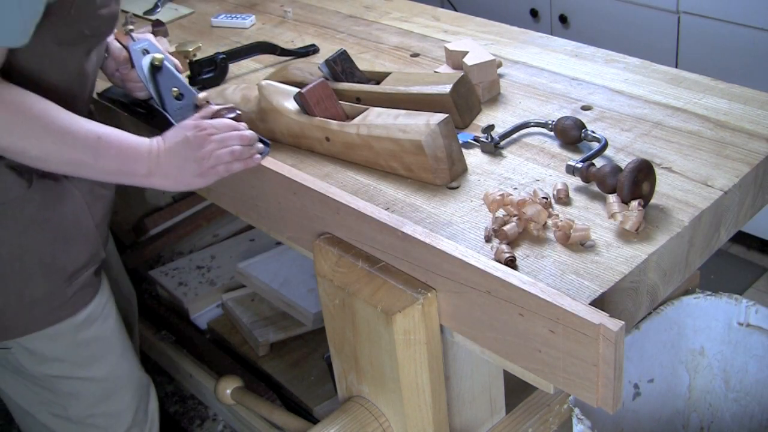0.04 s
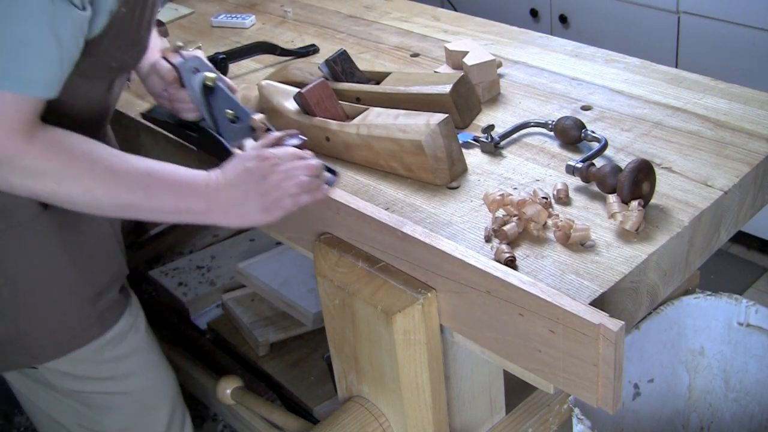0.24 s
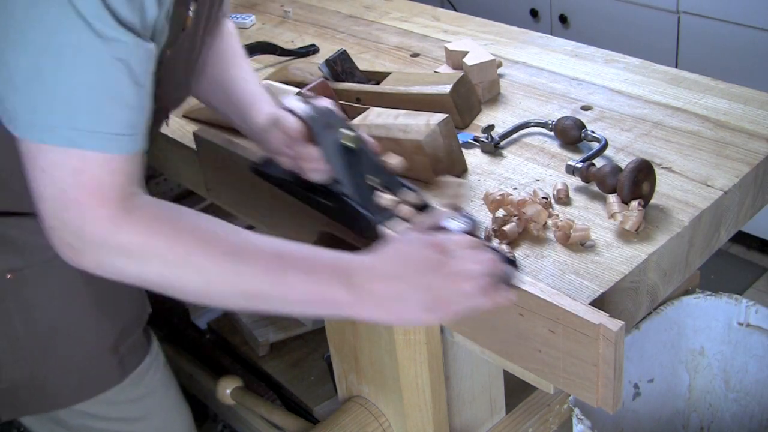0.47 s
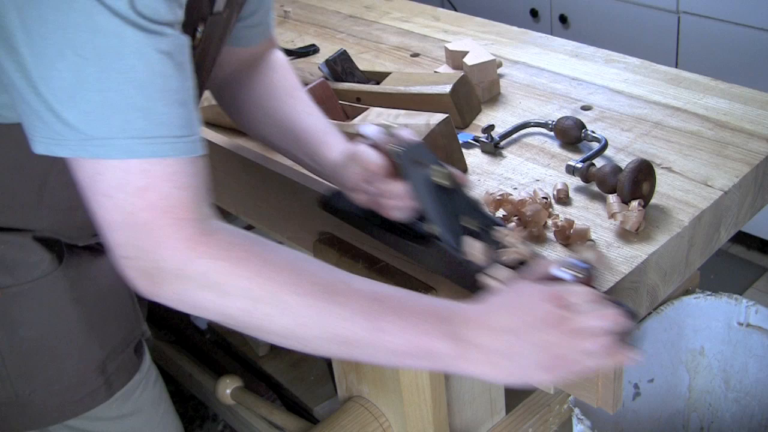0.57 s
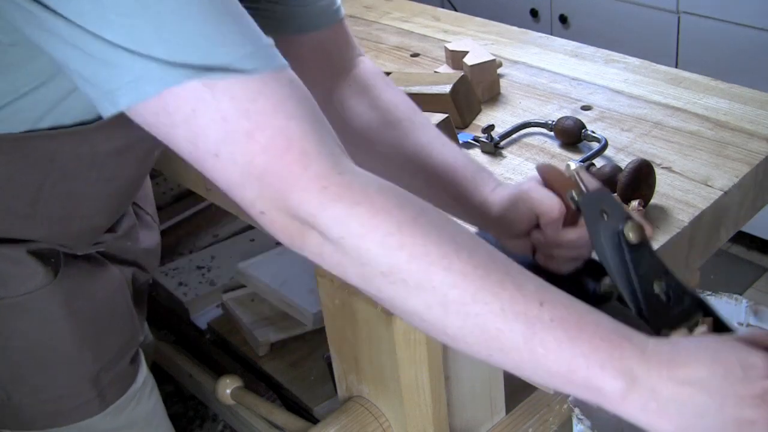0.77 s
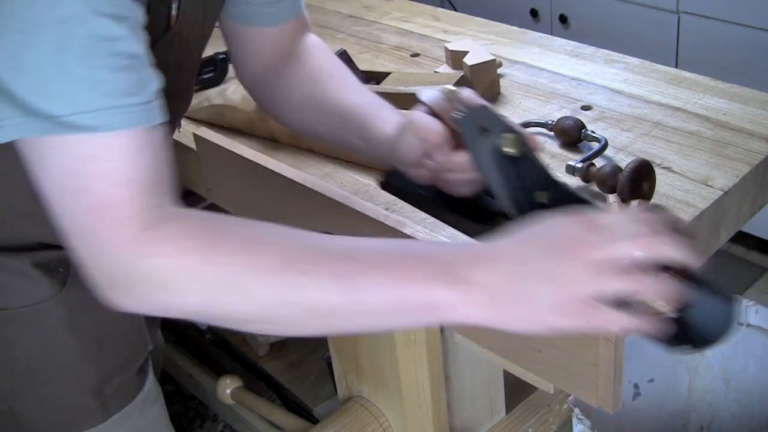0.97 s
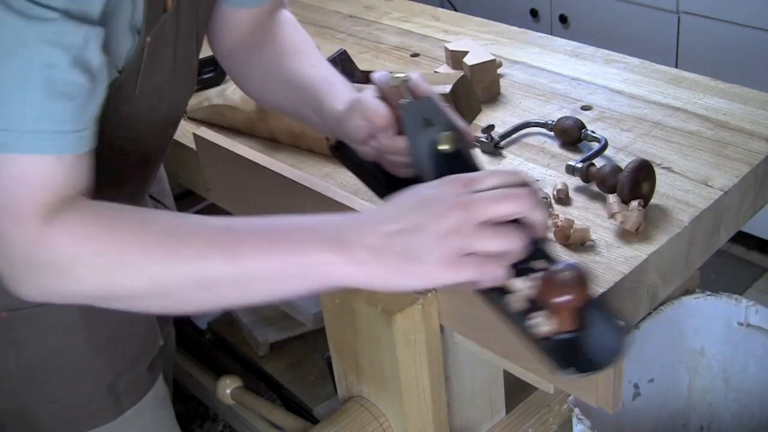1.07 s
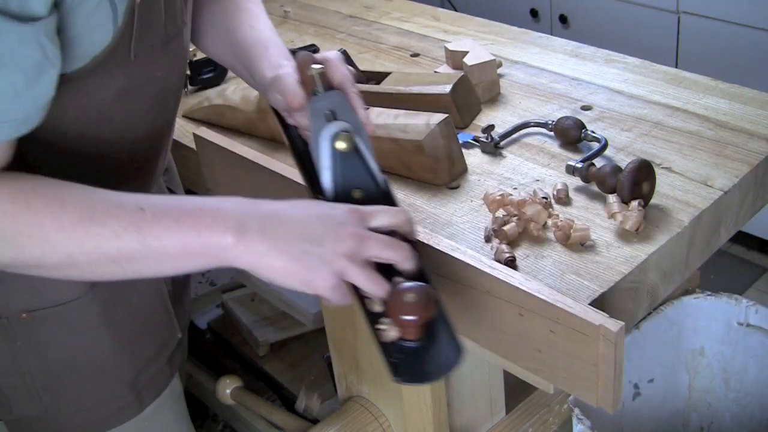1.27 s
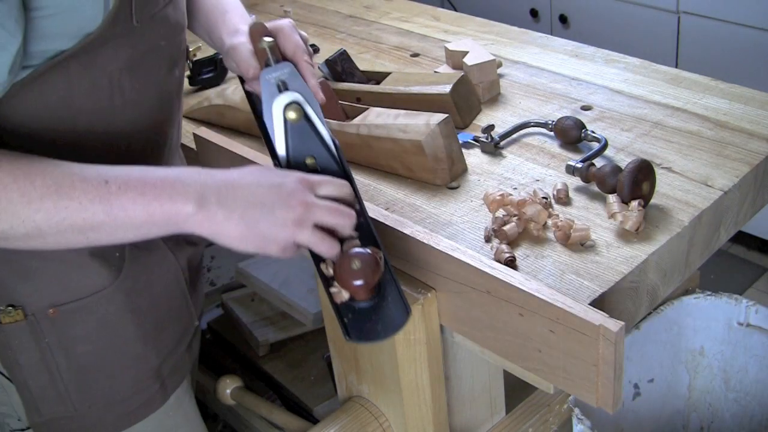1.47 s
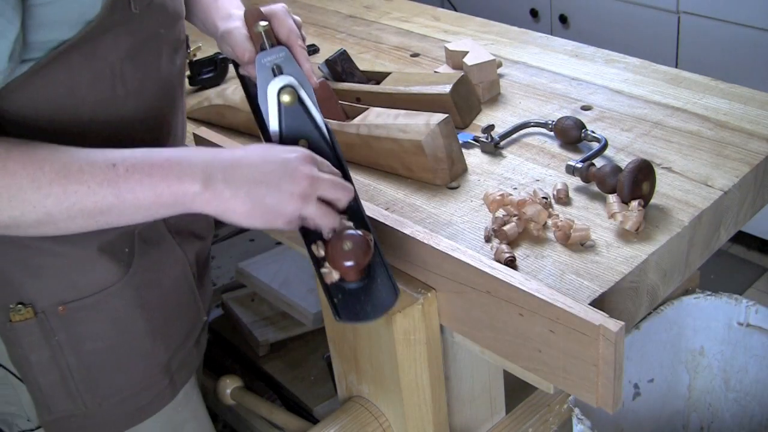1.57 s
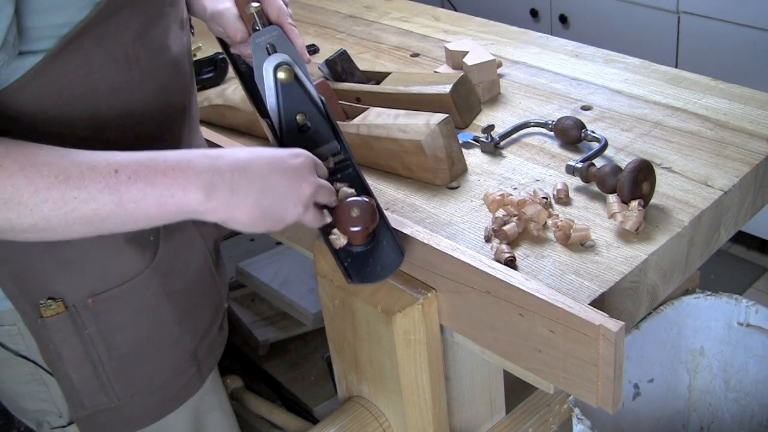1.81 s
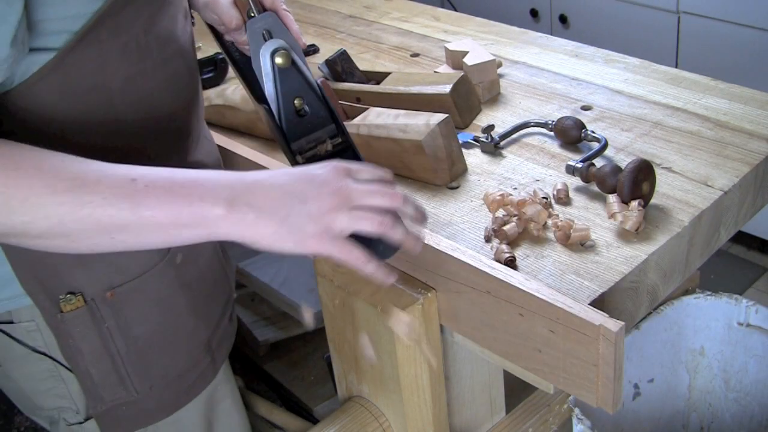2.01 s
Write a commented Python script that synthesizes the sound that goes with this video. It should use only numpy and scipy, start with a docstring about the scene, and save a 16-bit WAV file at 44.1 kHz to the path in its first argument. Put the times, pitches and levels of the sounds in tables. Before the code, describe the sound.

A metal hand plane shaves a board in one long rasping stroke, then bumps and faint rustling

```python
"""In a small workshop, a metal hand plane takes one long stroke along a board edge.
The shaving breaks at a rate that follows the push, heard as a wavering buzz of two sine tones.
Random clicks stand for tearing fibres: they ring board and iron and make the curl hiss; rough bands groan.
Short noise bursts are snaps and ticks; dying sines are dull bumps as the plane lifts, and one later low knock.
Bursts of grains are fingers pulling the rustling shaving out; room echo, rumble and air lie around it."""
import sys
import numpy as np
from scipy import signal
from scipy.io import wavfile

SR = 44100
rng = np.random.default_rng(int(sys.argv[2]) if len(sys.argv) > 2 else 0)


def wav_record(signal):
    """Record a signal, one row per channel, as 16-bit PCM in the file named by sys.argv[1]."""
    frames = np.transpose(np.atleast_2d(signal))
    bounded = np.clip(frames, -1, 1)
    # unit amplitude maps onto the largest positive 16-bit level
    quanta = np.round(bounded * 32767).astype(np.int16)
    wavfile.write(sys.argv[1], SR, quanta)


N = 90404   # length of the scene in samples


def from_db(db):
    """Turn a level in dB into a gain."""
    return 10 ** (np.asarray(db) / 20)


def rms_one(x):
    """Scale a sound to an average strength (rms) of 1."""
    return x / np.sqrt(np.mean(x ** 2) + 1e-20)


def seconds():
    """The time of every sample in seconds."""
    return np.arange(N) / SR


def in_time(rows):
    """Join the rows of a table: one line of straight pieces per column; the first column is the time."""
    times, *columns = np.transpose(rows)
    return [np.interp(seconds(), times, column) for column in columns]


def drift(rate_hz):
    """Random wandering around 0 with rms 1; a higher rate wanders faster."""
    step = 40   # computed only at every 40th sample, then joined by lines
    r = np.exp(-2 * np.pi * rate_hz * step / SR)
    noise = rng.standard_normal(N // step + 2002)
    slow = signal.lfilter([1], [1, -2 * r, r * r], noise)[2000:]   # skip the start-up of the filter
    return np.interp(np.arange(N) / step, np.arange(len(slow)), rms_one(slow))


def band(x, low_hz, high_hz):
    """Keep mainly the sound between two frequencies."""
    edges = [low_hz, min(high_hz, SR * .45)]
    return signal.sosfilt(signal.butter(2, edges, "band", fs=SR, output="sos"), x)


def ring(x, hz, width_hz):
    """One resonance: a click of height 1 rings with height 1, and dies faster if the width is larger."""
    r, w = np.exp(-np.pi * width_hz / SR), 2 * np.pi * hz / SR
    return signal.lfilter([0, np.sin(w)], [1, -2 * r * np.cos(w), r * r], x + 1e-18)


def rings(x, peaks, patchy_db, rate_hz):
    """Several resonances whose strengths shift as the plane travels; rms 1."""
    total = 0
    for hz, width_hz, db in peaks:
        strength = from_db(db + patchy_db * drift(rate_hz))
        # the root makes wide and narrow resonances equally strong
        total = total + strength * np.sqrt(width_hz) * ring(x, hz, width_hz)
    return rms_one(total)


def grains(per_s, spread_db):
    """Random clicks of uneven size, pushing up or down."""
    happens = rng.random(N) < per_s / SR
    size = from_db(spread_db * np.minimum(rng.exponential(1, N), 5))
    return happens * size * rng.choice([-1, 1], N)


def coloured(pair, spectrum, patchy_db, rate_hz):
    """Third-octave bands, each with its own level and flicker, taken in turn from two sounds; rms 1."""
    hz, db = np.transpose(spectrum)
    edges = hz[0] * 2 ** np.arange(0, np.log2(hz[-1] / hz[0]) + 1 / 3, 1 / 3)
    total = 0
    for k, (low, high) in enumerate(zip(edges, edges[1:])):
        band_db = np.interp(np.log(low * high) / 2, np.log(hz), db)
        flicker = from_db(band_db + patchy_db * drift(rate_hz))
        total = total + flicker * band(pair[k % 2], low, high)
    return rms_one(total)


# Tone colour of the shop air. Each row: frequency in Hz, relative strength in dB per Hz.
AIR_COLOUR = [(250, -31), (400, -8.5), (700, -10.5), (2300, -17), (4000, -20.5), (10000, -25), (15500, -32)]
# Loudness of the shop air. Each row: time in seconds, level in dB.
AIR_LEVEL = [(0, -66.5), (1.7, -61), (2.05, -67.5)]


def shop_air():
    """Steady noise of the shop, with bands that flicker a little."""
    noise = rng.standard_normal((2, N))
    return from_db(in_time(AIR_LEVEL)[0]) * coloured(noise, AIR_COLOUR, 1.0, 6.2)


# Bench and body move. Each row: time in seconds, deep level in dB, low level in dB before its wobble.
RUMBLE = [(0.0, -56, -62.5), (0.21, -52, -54), (0.28, -81, -44), (0.5, -47, -59), (0.58, -84, -61),
          (0.69, -48, -69), (0.87, -51.5, -48), (0.93, -36.5, -41.5), (1.04, -50, -56.5),
          (1.3, -49.5, -59.5), (1.58, -56, -56), (1.7, -56.5, -65), (1.87, -61, -59.5), (2.05, -61.5, -70)]


def rumble():
    """Bench and body move: deep noise, and low noise whose level wobbles."""
    deep_db, low_db = in_time(RUMBLE)
    # filtering twice makes the edges of each band steeper
    deep = band(band(rng.standard_normal(N), 16, 96), 16, 96)
    low = band(band(rng.standard_normal(N), 112, 475), 112, 475)
    return from_db(deep_db) * rms_one(deep) + from_db(low_db + 1.23 * drift(7.6)) * rms_one(low)


ROOM_T60_S, ROOM_DB, WALL_CUT_HZ = .3, -13, 7000   # time to die by 60 dB, echo gain, duller above this


def room_echo(x):
    """Room tail: the sound is smeared by dying noise, made duller by the walls."""
    t = np.arange(SR // 2) / SR
    tail = rng.standard_normal(len(t)) * from_db(-60 * t / ROOM_T60_S)
    tail = tail * (t > .006)   # the echo starts 6 ms late
    tail = signal.lfilter(*signal.butter(1, WALL_CUT_HZ, fs=SR), tail)
    tail = tail / np.sqrt(np.sum(tail ** 2))
    return from_db(ROOM_DB) * signal.fftconvolve(x, tail)[:N]


# Fingers crush the shaving. Each row: start in seconds, basic level in dB, centre in Hz,
# length in seconds, spread in octaves to each side.
RUSTLES = [(1.002, -52, 1910, 0.013, 0.32), (1.177, -57.5, 4500, 0.026, 0.55),
           (1.184, -63, 880, 0.012, 1.2), (1.413, -54, 6500, 0.026, 0.54), (1.41, -58, 2510, 0.02, 1),
           (1.461, -59.5, 4050, 0.079, 0.95), (1.542, -55, 453, 0.025, 1), (1.554, -56, 3760, 0.016, 1.5),
           (1.575, -61.5, 2180, 0.055, 0.6), (1.661, -60, 1780, 0.04, 0.56),
           (1.688, -61, 3740, 0.049, 0.74), (1.82, -62.5, 1130, 0.055, 0.97)]
RUSTLE_GRAINS_PER_S, RUSTLE_TOP_HZ = 7000, 10900
RUSTLE_HOLD, RUSTLE_FADE = .7, .81   # holding time and fading time, as shares of the length
RUSTLE_BITE, RUSTLE_BITE_S = .6, .006   # extra strength of the first touch, and how fast it goes


def rustles():
    """Each crush of the shaving is a burst of grains that holds, then fades."""
    out, t = np.zeros(N), seconds()
    for start, db, hz, length, octaves in RUSTLES:
        attack = np.clip((t - start) / .001, 0, 1)
        fading_for = np.maximum(t - start - RUSTLE_HOLD * length, 0)
        shape = attack * np.exp(-fading_for / (RUSTLE_FADE * length))
        shape = shape * (1 + RUSTLE_BITE * np.exp(-np.abs(t - start) / RUSTLE_BITE_S))
        clicks = grains(RUSTLE_GRAINS_PER_S, 3.1)
        crush = band(clicks, hz / 2 ** octaves, min(hz * 2 ** octaves, RUSTLE_TOP_HZ))
        out += from_db(db + 1.6 * drift(60)) * shape * rms_one(crush)
    return out


def place_hits(rows, t60_s, make_body):
    """Put a short sound, dying by 60 dB in the given time, at the start of each row."""
    out, t = np.zeros(N + SR), np.arange(int(t60_s * SR)) / SR
    for start, db, hz in rows:
        first = int(start * SR)
        out[first:first + len(t)] += from_db(db - 60 * t / t60_s) * make_body(hz, t)
    return out[:N]


# Dull bumps as the plane lifts, and one later low knock in the rustling.
# Each row: start in seconds, starting height in dB, pitch in Hz.
BUMPS = [(.906, -29, 260), (.909, -27, 185), (.922, -31, 55), (.949, -30, 140), (.972, -33, 100),
         (1.543, -46, 340)]


def bumps():
    """Dull bumps as the plane lifts, and one later low knock: each is a dying sine tone."""
    return place_hits(BUMPS, .06, lambda hz, t: np.sin(2 * np.pi * hz * t))


# Snaps in the cut and ticks in the rustling. Each row: start in seconds, relative strength in dB, pitch in Hz.
SNAPS = [(.150, -40, 1000), (.269, -27, 5200), (.303, -25, 8000), (.312, -19, 7500), (.433, -30, 7500),
         (.502, -27, 9000), (.753, -25, 6300), (.769, -22, 5000), (.804, -22, 4500), (1.413, -44, 6000),
         (1.543, -42, 1500), (1.544, -42, 2800), (1.543, -50, 9000)]


def snap_burst(hz, t):
    """Noise around one pitch, with rms one half before it is cut to length."""
    noise = band(rng.standard_normal(4410), hz / 1.7, hz * 1.4)
    return rms_one(noise)[:len(t)] / 2


def snaps():
    """Snaps and ticks: very short dying bursts of noise, in the cut and later in the rustling."""
    return place_hits(SNAPS, .012, snap_burst)


# Board and iron groan for a moment as the plane passes. Each row: start in seconds, length in seconds,
# first pitch in Hz, last pitch in Hz, basic level in dB.
GROANS = [(0.183, 0.031, 1205, 1210, -43.5), (0.296, 0.067, 570, 570, -37), (0.297, 0.063, 1663, 1630, -43),
          (0.353, 0.098, 752.5, 800, -39), (0.413, 0.062, 7360, 7500, -46),
          (0.42, 0.127, 1617, 1640, -36.5), (0.486, 0.13, 415, 615, -31.5),
          (0.501, 0.0465, 1132, 970, -40.5), (0.592, 0.038, 565.5, 470, -34),
          (0.597, 0.09, 1342, 1380, -36.5), (0.626, 0.0605, 598.4, 515, -29),
          (0.623, 0.058, 3740, 3500, -36.5), (0.657, 0.1, 1608, 1650, -34.5),
          (0.65, 0.149, 2068, 1980, -34.5), (0.662, 0.15, 3417, 3350, -35), (0.665, 0.059, 650, 585, -33.5),
          (0.685, 0.046, 1046, 1040, -32), (0.694, 0.1406, 536.3, 520, -30.5),
          (0.765, 0.091, 1045, 890, -34.5)]
GROAN_WIDTH, GROAN_WIDEST_HZ = .045, 45   # roughness rate as a share of the pitch, and its limit
GROAN_EDGE = .18   # share of the length spent swelling, and again fading
GROAN_STEADY = .6   # steady share under the rough band


def groans():
    """Each groan is a narrow, rough band gliding between two pitches."""
    out, t = np.zeros(N), seconds()
    for start, length, from_hz, to_hz, db in GROANS:
        progress = np.clip((t - start) / length, 0, 1)
        phase = 2 * np.pi * np.cumsum(from_hz + (to_hz - from_hz) * progress) / SR
        swell = np.clip(np.minimum(progress, 1 - progress) / GROAN_EDGE, 0, 1)
        width_hz = min(GROAN_WIDTH * from_hz, GROAN_WIDEST_HZ)
        rough = (GROAN_STEADY + drift(width_hz)) * np.sin(phase) + drift(width_hz) * np.cos(phase)
        out += from_db(db) * swell * rough
    return out


# The cut. Each row: time in seconds, board level in dB, iron level in dB,
# level in dB of the hissing curl before its flutter.
CUT = [(0.153, -42.5, -77, -60), (0.181, -41, -75, -54.5), (0.239, -39, -74, -47.5),
       (0.309, -33.5, -42.5, -39), (0.325, -44, -67, -41), (0.367, -31.5, -64, -38.5),
       (0.401, -40.5, -59, -45), (0.435, -31, -42, -38), (0.449, -38.5, -43, -40.5),
       (0.519, -31, -33.5, -34.5), (0.539, -34, -40.5, -42), (0.675, -31, -31, -31),
       (0.695, -34.5, -31.5, -32.5), (0.74, -30.5, -32.5, -35.5), (0.8, -26.5, -26.5, -30.5),
       (0.923, -53.5, -66, -95), (1.0, -57, -114.5, -66)]
# Resonances of the board. Each row: pitch in Hz, width in Hz, relative strength in dB.
BOARD_RINGS = [(520, 240, -3), (1050, 250, -4), (1640, 220, -4), (2050, 250, -5)]
# Resonances of the iron. Each row: pitch in Hz, width in Hz, relative strength in dB.
IRON_RINGS = [(2600, 500, -2), (3400, 400, 0), (5000, 900, -1)]
# Broad noise of the board. Each row: frequency in Hz, relative strength in dB per Hz.
BOARD_WASH = [(150, -46), (250, -30.5), (532, 1.5), (690, -4.5), (1630, -4), (2380, -18), (3440, -44),
              (4200, -17), (5460, -38), (9240, -120)]
# Hiss of the curl. Each row: frequency in Hz, relative strength in dB per Hz.
CURL_COLOUR = [(1530, -25), (2600, 13.5), (3090, -2.5), (3450, -17), (4070, 1.5), (4980, 2), (8980, 9.5),
               (11200, 0.5), (15500, -11)]
BOARD_WASH_DB = 8   # broad noise against the rings of the board
TEARS_PER_S, TEAR_SPREAD_DB = 5000, 3.0
BITE_S = .149   # the iron meets the wood


def cut():
    """Dense tears of fibre drive the board, the iron and the curl."""
    board_db, iron_db, curl_db = in_time(CUT)
    tears = [grains(TEARS_PER_S, TEAR_SPREAD_DB) for _ in range(2)]
    wash = from_db(BOARD_WASH_DB) * coloured(tears, BOARD_WASH, 2.0, 18)
    board = rms_one(rings(tears[0], BOARD_RINGS, 2.5, 10) + wash)
    iron = rings(tears[1], IRON_RINGS, 2.0, 9)
    curl = coloured(tears, CURL_COLOUR, 2.5, 12) * from_db(1.1 * drift(40))
    t = seconds()
    on = np.clip((t - BITE_S) / .004, 0, 1) * np.clip((CUT[-1][0] - t) / .019, 0, 1)
    return on * (from_db(board_db) * board + from_db(iron_db) * iron + from_db(curl_db) * curl)


# The stroke. Each row: time in seconds, average shaving breaks per second, basic buzz level in dB.
BUZZ = [(.15, 122, -59.5), (.22, 175, -54.5), (.3, 280, -51), (.4, 280, -44.5), (.45, 334, -36),
        (.52, 351, -37), (.57, 417, -38.5), (.63, 430, -30.5), (.69, 405, -44.5), (.83, 380, -38),
        (.9, 370, -35.5)]
# Strength in dB of the tone at one and at two times the breaking rate, before flutter.
OVERTONES_DB = [-2, -22.5]
BUZZ_WANDER, BUZZ_FLUTTER_DB = .04, 4.5   # unevenness of the rate (as a share) and of the level
BUZZ_UNREST_HZ = 70   # how fast the rate wanders; the level flutters half as fast


def buzz():
    """The shaving breaks nearly regularly: a wavering tone whose pitch follows the push."""
    rate, db = in_time(BUZZ)
    wavering_rate = rate * (1 + BUZZ_WANDER * drift(BUZZ_UNREST_HZ))
    phase = 2 * np.pi * np.cumsum(wavering_rate) / SR
    tone = 0
    for multiple, tone_db in enumerate(OVERTONES_DB, start=1):
        flutter = from_db(tone_db + BUZZ_FLUTTER_DB * drift(BUZZ_UNREST_HZ / 2))
        tone = tone + flutter * np.sin(multiple * phase)
    t = seconds()
    on = np.clip((t - BUZZ[0][0]) / .011, 0, 1) * np.clip((BUZZ[-1][0] - t) / .022, 0, 1)
    return np.sqrt(2) * from_db(db) * on * tone   # the root gives a plain sine an rms of 1


def scene():
    """All sources reach one spot; only the near ones get an echo."""
    near = rustles() + bumps() + snaps() + groans() + cut() + buzz()
    mono = shop_air() + rumble() + room_echo(near) + near
    return np.array([mono, mono])


OVERLOAD = .25   # peaks are rounded towards this height
BALANCE_DB, TREBLE_BALANCE_DB = 1.63, .4   # left a little louder; the treble sits nearer the middle
TREBLE_HZ, CUTOFF_HZ = 3500, 15900   # the treble starts at the first; the top is cut from the second on
TREBLE_SHIFT_S = 3.3e-6   # small treble shift between left and right, for a little width
CAPSULE_HISS_DB = -66   # gain of the random noise that makes each capsule's hiss


def record(dry):
    """Two close capsules: rounded peaks, left a little louder, treble nearer the middle, hiss, cut top."""
    dry = OVERLOAD * np.tanh(dry / OVERLOAD)
    low = signal.sosfiltfilt(signal.butter(3, TREBLE_HZ, fs=SR, output="sos"), dry)
    treble = dry - low
    sides = np.array([[.5], [-.5]])   # left, right
    # adding a little of the slope shifts a sound slightly in time
    treble = treble + sides * TREBLE_SHIFT_S * SR * np.gradient(treble, axis=1)
    out = low * from_db(BALANCE_DB * sides) + treble * from_db(TREBLE_BALANCE_DB * sides)
    hiss = signal.lfilter([1], [1, -.3], rng.standard_normal((2, N)))
    out = out + from_db(CAPSULE_HISS_DB) * hiss
    return signal.sosfilt(signal.cheby2(18, 70, CUTOFF_HZ, fs=SR, output="sos"), out)


dry = scene()
out = record(dry)
wav_record(out)
```